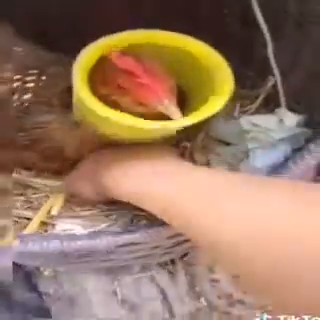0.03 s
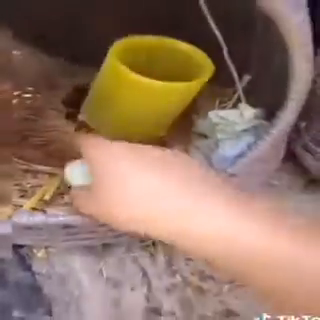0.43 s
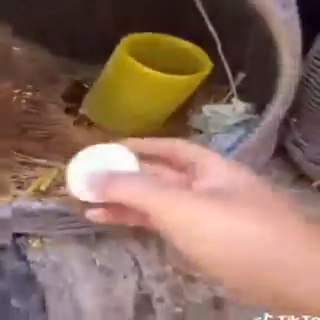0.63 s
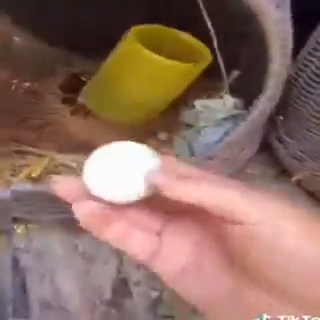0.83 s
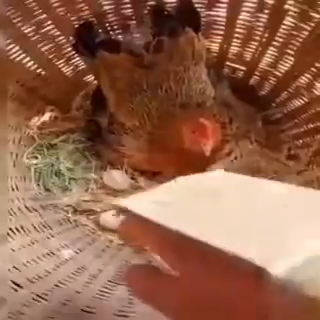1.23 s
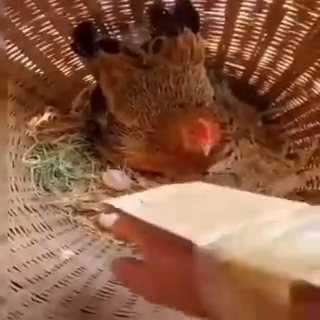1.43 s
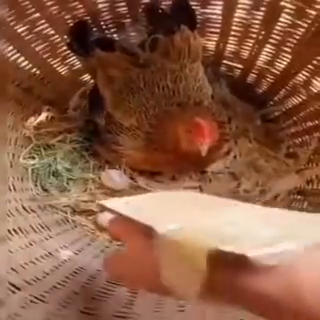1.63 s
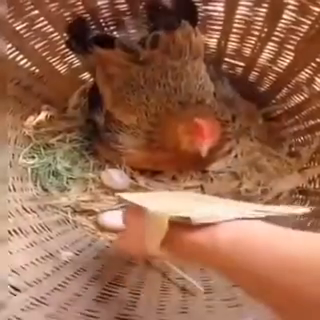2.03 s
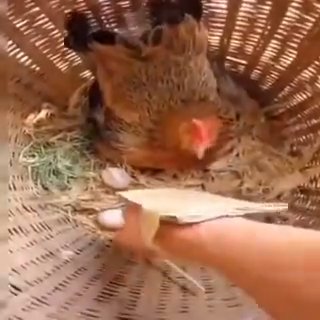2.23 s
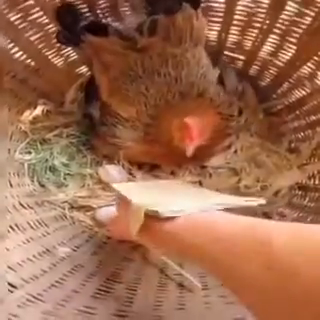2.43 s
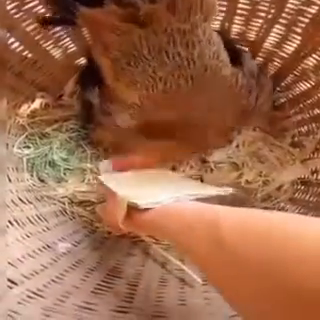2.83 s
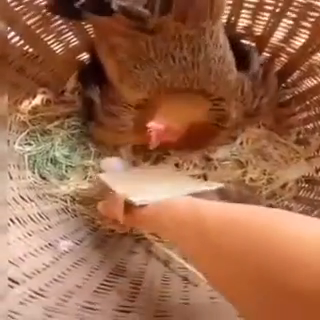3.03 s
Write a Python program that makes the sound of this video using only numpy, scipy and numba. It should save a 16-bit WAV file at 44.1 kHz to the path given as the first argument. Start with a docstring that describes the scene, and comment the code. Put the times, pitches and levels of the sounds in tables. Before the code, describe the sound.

A broody hen growls harshly, hisses and squawks among quick sharp clucks, with another hen droning behind. Before that, a hand rustles nest straw close on the left with soft microphone bumps, followed by a brief silence.

```python
"""A hand digs in nest straw for an egg, close to the left microphone: stalks rub and snap, and bumps
on the phone thud on the right. After a short silence a broody hen in a wicker basket growls, hisses
and squawks, while sharp clucks come about five a second and another hen drones further off.
The calls are syrinx pulses and chopped air shaped by the throat; a small shed answers them."""
import sys
import numpy as np
from scipy import signal
from scipy.fft import rfft, irfft
from scipy.io import wavfile
from scipy.ndimage import uniform_filter1d
from numba import njit

SR = 44100
rng = np.random.default_rng(int(sys.argv[2]) if len(sys.argv) > 2 else 0)


def store_wav(level_fs):
    """Save 16-bit WAV to argv[1]."""
    pcm = np.round(np.clip(np.atleast_2d(level_fs), -1, 1) * 32767)
    wavfile.write(sys.argv[1], SR, pcm.T.astype(np.int16))


N = 136710
T = np.arange(N) / SR
TOP_HZ = 15400


def broody_hen():
    """Growls and squawk pass through a beak that opens and closes as the head turns."""
    # time_s, beak_hz, strength_db, pan_db
    head = [(1.38, 1310, 9, 3.5), (1.45, 1430, 14.5, -4.5), (1.52, 1260, -1, -2.5), (1.6, 1460, 6, 2),
            (1.64, 935, 4, -2), (1.71, 950, -23, 1), (1.88, 1230, -1, -5.5), (2.17, 1670, 13, -2.5),
            (2.249, 1248, -1, -0.5), (2.5, 1165, 6.5, 0), (2.55, 1130, 1, -4.5), (2.59, 1190, -17, -1.5),
            (2.67, 1130, 9, 2.5), (2.721, 1586, 5, 4), (2.83, 1190, -13, 0.5)]
    time_s, beak_hz, strength_db, pan_db = np.array(head, float).T
    voice = growls() + squawk()
    strength = amp(np.interp(T, time_s, strength_db))
    beak = strength * resonance(voice, np.interp(T, time_s, beak_hz), width_hz=430.0)
    return shed((voice + beak) / np.sqrt(1 + strength), np.interp(T, time_s, pan_db))


def growls():
    """Low rasping calls; the throat tightens differently for each."""
    # per growl, rows of: time_s, pitch_hz, level_db, roughness
    contours = [
        [(1.368, 423.2, -29.5, 0.97), (1.41, 431.8, -26, 1), (1.47, 465.4, -26.5, 0.79),
         (1.53, 440.9, -26, 0.9), (1.6, 459.2, -25.5, 0.75), (1.65, 457.4, -32.5, 0.32),
         (1.69, 443.9, -25.5, 0.63), (1.725, 398, -48, 0.16)],
        [(1.862, 399.4, -71, 0.71), (1.874, 439, -31.5, 1.02), (1.92, 413.7, -38.5, 0.84),
         (2.01, 401.6, -29, 0.85), (2.14, 399.4, -29, 0.79), (2.19, 414.4, -22, 0.3), (2.23, 417.8, -22, 0.73),
         (2.28, 440.5, -31.5, 0.71), (2.33, 419.4, -32, 0.84)],
        [(2.63, 357.6, -33.5, 0.54), (2.675, 375.3, -31, 0.54), (2.72, 395.4, -24, 0.2),
         (2.76, 399.5, -26, 0.45), (2.80, 408, -32.5, 0.99)],
        [(2.80, 410.3, -30, 0.83), (2.86, 419.3, -31.5, 0.97), (2.9, 405.4, -41.5, 1.25),
         (2.96, 425.6, -34, 0.64), (3.02, 395, -38.5, 0.88), (3.1, 384.6, -36.5, 0.98)],
    ]
    # freq_hz, gain_db
    throat = [(200, -31), (420, -16.5), (600, -15), (850, -12.5), (1020, -9.5), (1300, -7.5), (1600, -13),
              (2000, -14), (2450, -9.5), (3050, -34), (3600, -15), (5200, -28.5), (6500, -22), (8000, -70),
              (12000, -31), (15000, -55)]
    # per growl: freq_ratio, treble_db_per_octave, bass_db_per_octave
    throat_shapes = [(1.04, -0.5, 3.5), (0.995, -1, 2), (1.04, -3, -1.5), (0.99, 0, -4)]
    freq_hz, gain_db = np.array(throat, float).T
    octaves = np.log2(freq_hz / 1296)  # from the tilt's pivot
    out = 0
    for contour, (ratio, treble, bass) in zip(contours, throat_shapes):
        tilt_db = treble * np.maximum(octaves, 0) + bass * np.maximum(-octaves, 0)
        out = out + held_call(contour, np.column_stack([freq_hz * ratio, gain_db + tilt_db]))
    return out


def squawk():
    """One loud, bright call with the beak open."""
    # time_s, pitch_hz, level_db, roughness
    contour = [(2.44, 570, -28, .95), (2.462, 585, -16.5, 0.8), (2.485, 573.3, -18.5, 0.43),
               (2.503, 576.7, -19, 0.46), (2.55, 559.4, -18.5, 0.29), (2.585, 562.6, -17.5, 0.36),
               (2.603, 587, -19, 0.58), (2.618, 602.3, -10.5, 0.12), (2.634, 592, -22.5, 0.88)]
    # freq_hz, gain_db
    throat = [(250, -16), (560, -20), (850, -11.5), (1150, -2), (1450, -7), (1700, -9), (2000, -12),
              (2330, -1), (2600, -6), (2880, -7.5), (3600, -20), (4000, -12), (4500, -15.5), (5400, -23),
              (6200, -15), (8000, -31), (12000, -36), (15500, -38)]
    return held_call(contour, throat)


def held_call(contour, throat):
    """A drawn-out call, slightly unsteady in pitch and level."""
    waver_hz, edge_s = 45.31, 0.0084
    time_s, pitch_hz, level_db, roughness = np.array(contour, float).T
    wavering_hz = np.interp(T, time_s, pitch_hz) * (1 + 0.01 * wander(waver_hz))
    voice = syrinx(wavering_hz, np.interp(T, time_s, roughness), throat)
    level = amp(np.interp(T, time_s, level_db) + 2.01 * wander(waver_hz))
    outside_s = np.maximum(time_s[0] - T, 0) + np.maximum(T - time_s[-1], 0)
    return voice * level * np.exp(-outside_s / edge_s)


def syrinx(pitch_hz, roughness, throat):
    """Pulses that grow uneven with roughness, and air chopped by each cycle, shaped by the throat."""
    roughness = np.clip(roughness, 0, 1)
    jitter = 0.04 * roughness * wander(rate_hz=398.4)
    phase = 2 * np.pi * np.cumsum(pitch_hz * (1 + jitter)) / SR
    spread_rad = 0.16 * np.pi  # the ringing windpipe spreads each pulse over its cycle
    harmonics = (np.cos(k * phase - spread_rad * k ** 2) * (k * pitch_hz < TOP_HZ) for k in range(1, 25))
    alternation = 1 + 0.55 * roughness * np.cos(phase / 2)  # strong and weak pulses in turn
    pulses = unit(sum(harmonics)) * alternation
    air = unit(noise() * (1 + np.cos(phase) / 2))
    flutter = amp(1.5 * roughness * wander(rate_hz=171.1))
    return colour((np.sqrt(1 - roughness ** 2) * pulses + roughness * air) * flutter, throat)


def clucks():
    """Short barks whose pitch and level rise and fall in one arch."""
    # peak_s, half_length_s, top_hz, level_db, roughness, arch_depth
    barks = [(1.376, 0.0078, 635, -18, .7, 0.092), (1.389, 0.019, 648.8, -20, 0.51, .12),
             (1.558, .029, 685.3, -18.5, 0.6, .12), (1.745, 0.01265, 526.3, -26, 0.27, 0.046),
             (1.768, 0.025, 687, -19.5, 0.22, 0.33), (1.989, .027, 660, -20.5, .12, 0.35),
             (2.396, 0.028, 669, -17.5, 0.55, 0.075), (2.831, 0.039, 615, -22, 0.51, 0.13)]
    # freq_hz, gain_db
    throat = [(300, -8), (620, -27), (900, 0.5), (1300, 8), (1900, -16.5), (2450, -8.5), (3000, -18),
              (3500, -3.5), (4400, -23), (7000, -24.5), (9000, -37), (15000, -43)]
    fall_db, blend_s = 18.5, 0.0028
    peak_s, half_length_s, top_hz, level_db, roughness, arch_depth = np.array(barks, float).T
    nearest = np.searchsorted((peak_s[1:] + peak_s[:-1]) / 2, T)
    away = ((T - peak_s[nearest]) / half_length_s[nearest]) ** 2
    pitch_hz = top_hz[nearest] * (1 - arch_depth[nearest] * away * np.exp(-away / 2))
    swell = uniform_filter1d(amp(level_db[nearest] - fall_db * away), int(blend_s * SR) + 1)
    return syrinx(pitch_hz, roughness[nearest], throat) * swell


def hisses():
    """Air forced through the open beak, swelling and dying away at the crests of the calls."""
    # peak_s, rise_s, fall_s, level_db
    breaths = [(1.689, 0.19, 0.034, -27.5), (2.217, 0.14, 0.098, -24.5), (2.529, 0.22, 0.18, -41),
               (2.744, 0.15, 0.13, -29)]
    # freq_hz, gain_db
    spectrum = [(1500, 0), (2800, 4.5), (3200, 5.5), (4400, 3.5), (5000, -5.5), (6400, 1.5), (7700, -14),
                (9000, -7.5), (12000, -8.5), (15500, -24)]
    swell = sum(amp(level_db - 20 * np.maximum((peak_s - T) / rise_s, (T - peak_s) / fall_s) ** 2)
                for peak_s, rise_s, fall_s, level_db in breaths)
    return colour(noise() * amp(2 * wander(rate_hz=150)), spectrum) * swell


def far_hen():
    """A second hen holds one long drone."""
    # time_s, pitch_hz, level_db, roughness
    contour = [(1.68, 555, -45, 0.3), (1.78, 565, -29.5, 0.53), (1.83, 568, -57, 0.51),
               (1.89, 567.6, -34, 0.46), (2.03, 594.3, -26.5, 0.54), (2.09, 580, -32.5, 0.72),
               (2.22, 612, -33, 0.45), (2.28, 607, -29.5, 0.16), (2.34, 603, -26.5, 0.5),
               (2.44, 574, -34, 0.69)]
    # freq_hz, gain_db
    throat = [(300, -22), (590, -9), (1200, -1.5), (1800, -10.5), (2400, -12), (3600, -15.5), (5000, -38),
              (9000, -53), (15000, -54)]
    return held_call(contour, throat)


def straw():
    """Dry stalks rubbing under the hand: a scratchy hiss that comes in small surges."""
    # time_s, body_db, treble_db
    levels = [(0.0, -43, -45.5), (0.052, -41.5, -61), (0.066, -39, -42), (0.092, -44.5, -47.5),
              (0.188, -41.5, -42), (0.335, -35, -41.5), (0.374, -34.5, -43), (0.526, -38, -50.5),
              (0.728, -59.5, -73), (0.768, -49.5, -63), (0.798, -45.5, -55.5), (0.93, -51, -69),
              (0.976, -45, -60.5), (1.076, -52.5, -77), (1.13, -51, -68), (1.161, -41.5, -82.5),
              (1.19, -76.5, -83)]
    # freq_hz, gain_db
    body_spectrum = [(150, -42), (250, -4), (414, -3), (458, -12), (568, -8.5), (675, -7), (1120, -12.5),
                     (1310, -12.5), (1820, -13), (5210, -14), (7800, -32.5), (10100, -68), (17200, -120)]
    # freq_hz, gain_db
    treble_spectrum = [(4120, -47), (7000, 0.5), (8160, -12), (13200, -3), (15800, -9)]
    time_s, body_db, treble_db = np.array(levels).T

    def rub(spectrum, level_db):
        grains = noise() * np.exp(0.11 * wander(rate_hz=2500))
        surges = amp(2 * wander(rate_hz=70.1))
        return colour(grains * surges, spectrum) * amp(np.interp(T, time_s, level_db))

    channels = [rub(body_spectrum, body_db + 2) + rub(treble_spectrum, treble_db + 2.5) for _ in range(2)]
    return pan(np.array(channels), pan_db=22)


def snaps():
    """Single stalks that crack and die away at once."""
    # start_s, level_db, centre_hz, decay_s, pan_db
    stalks = [(0.064, -26.5, 6500, 0.0018, 39), (0.346, -28.5, 5600, 0.014, 35),
              (0.348, -26.5, 810, 0.014, 34), (0.434, -24, 4160, 0.015, 39),
              (0.488, -35.5, 5660, 0.034, 63), (0.563, -39, 5500, 0.0086, 24.5),
              (0.856, -36, 5130, 0.0058, 32), (1.158, -40.5, 2300, 0.0057, 17.5),
              (3.056, -37, 5600, 0.075, 6)]
    out = 0
    for start_s, level_db, centre_hz, decay_s, pan_db in stalks:
        burst = colour(noise(), [(centre_hz / 4, -17), (centre_hz, 0), (centre_hz * 3, -24)])
        envelope = amp(level_db) * (T >= start_s) * np.exp(-np.abs(T - start_s) / decay_s)
        out = out + pan(burst * envelope, pan_db)
    return out


def handling():
    """Low rumble and soft bumps on the phone, mostly at the right microphone."""
    # freq_hz, gain_db
    rumble_spectrum = [(12, -19), (20, 7), (65, 2), (232, -20), (300, -23), (362, -31.5), (414, -22),
                       (500, -33.5), (650, -34.5), (1100, -120)]
    # time_s, level_db
    rumble_levels = [(0, -27), (.3, -22.5), (.6, -30), (.78, -30), (1.0, -27), (1.16, -28.5)]
    # peak_s, level_db, pitch_hz, half_length_s
    bumps = [(0.355, -16.5, 73, 0.0078), (0.519, 2, 59.6, 0.011), (0.528, -6, 130, 0.0077),
             (0.632, -11, 60, 0.0047), (0.946, -8, 78, 0.007), (1.067, -10, 58, 0.0079),
             (1.089, -10, 68.4, 0.015)]
    low = colour(noise(), rumble_spectrum) * amp(np.interp(T, *np.array(rumble_levels).T))
    for peak_s, level_db, pitch_hz, half_length_s in bumps:
        envelope = amp(level_db) * np.exp(-((T - peak_s) / half_length_s) ** 2)
        low = low + envelope * np.sin(2 * np.pi * pitch_hz * (T - peak_s))
    return pan(low, pan_db=-25)


def murmurs():
    """Faint hoarse notes, each fluttering around one pitch."""
    # peak_s, half_length_s, pitch_hz, level_db
    notes = [(.205, 0.033, 325, -38.5), (0.285, 0.013, 432, -31.5), (0.393, 0.086, 687, -52),
             (0.608, 0.12, 754, -43.5), (3.059, 0.034, 723, -39)]
    out = 0
    for peak_s, half_length_s, pitch_hz, level_db in notes:
        tone = np.sin(2 * np.pi * pitch_hz * T + wander(rate_hz=100)) * wander(rate_hz=100)
        out = out + tone * amp(level_db) * np.exp(-((T - peak_s) / half_length_s) ** 2)
    return out


def shed(voice, pan_db):
    """A voice at its place, with dense short reflections that mostly differ between the microphones."""
    t60_s, delay_s, damping_hz = 0.072, 0.0013, 13000
    mid_db, side_db = -6, -1
    t = T[:SR // 2]
    tail = rng.standard_normal((2, len(t))) * amp(-60 * t / t60_s) * (t > delay_s)
    tail /= np.sqrt(np.sum(tail ** 2, axis=1, keepdims=True))
    pole = np.exp(-2 * np.pi * damping_hz / SR)
    mid, side = signal.lfilter([1 - pole], [1, -pole], tail)
    response = amp(mid_db) * mid + amp(side_db) * np.array([side, -side])
    return pan(voice + signal.fftconvolve(voice[None], response, axes=1)[:, :N], pan_db)


def shed_air():
    """Steady background whose bass is shared by both microphones."""
    # freq_hz, gain_db
    spectrum = [(20, -5.5), (45, 6), (80, 5.5), (130, -8.5), (250, -8), (600, -5.5), (1300, -5.5),
                (4000, -21), (9000, -28.5), (15000, -38)]
    mid, side = colour(noise(), spectrum), colour(noise(), spectrum)
    side = signal.sosfilt(signal.butter(4, 300, "high", fs=SR, output="sos"), side)
    return np.array([mid + side, mid - side])


@njit
def resonance(x, centre_hz, width_hz):
    """State-variable band-pass with a moving centre."""
    y, band_state, low_state = np.empty(len(x)), 0., 0.
    for i in range(len(x)):
        g, damping = np.tan(np.pi * centre_hz[i] / SR), width_hz / centre_hz[i]
        band = (band_state + g * (x[i] + 1e-18 - low_state)) / (1 + g * (g + damping))
        band_state = 2 * band - band_state
        low_state += 2 * g * band
        y[i] = damping * band
    return y


def colour(x, outline):
    """Filter by a (freq_hz, gain_db) outline, falling 10 dB an octave past its ends; rms 1."""
    freq_hz, gain_db = np.array(outline, float).T
    knots = np.log2(freq_hz)
    octaves = np.log2(np.maximum(np.fft.rfftfreq(N, 1 / SR), 1))
    outside = np.maximum(knots[0] - octaves, 0) + np.maximum(octaves - knots[-1], 0)
    return unit(irfft(rfft(x) * amp(np.interp(octaves, knots, gain_db) - 10 * outside), N))


def pan(x, pan_db):
    """Place a sound by its level difference, left minus right."""
    gains = amp(np.array([[1], [-1]]) * pan_db / 2)
    return x * gains / np.sqrt(np.mean(gains ** 2, axis=0))


def wander(rate_hz):
    """Straight lines between random values, rms 1."""
    return unit(np.interp(T * rate_hz, np.arange(N), noise()))


def noise():
    """White noise."""
    return rng.standard_normal(N)


def amp(db):
    """Decibels to gain."""
    return 10 ** (np.asarray(db) / 20)


def unit(x):
    """Scale to rms 1."""
    return x / np.sqrt(np.mean(x ** 2) + 1e-20)


def scene():
    """The hand in the nest, a silence, then the hens."""
    nest_end_s, hens_start_s = 1.178, 1.369
    hens = (broody_hen() + shed(clucks(), pan_db=0)
            + shed(far_hen(), pan_db=-1.5) + shed(hisses(), pan_db=-2.5))
    air = shed_air()
    nest = straw() + handling() + air * amp(-61)
    fade_out = np.clip((nest_end_s - T) / 0.0071, 0, 1)
    fade_in = np.clip((T - hens_start_s) / 0.0025, 0, 1)
    return nest * fade_out + snaps() + shed(murmurs(), pan_db=0.9) + (hens + air * amp(-39.5)) * fade_in


def record(dry):
    """The phone clips the hardest peaks and cuts the top."""
    low_pass = signal.ellip(8, 0.2, 70, TOP_HZ, fs=SR, output="sos")
    return signal.sosfilt(low_pass, np.clip(dry, -0.93, 0.93))


dry = scene()
out = record(dry)
store_wav(out)
```